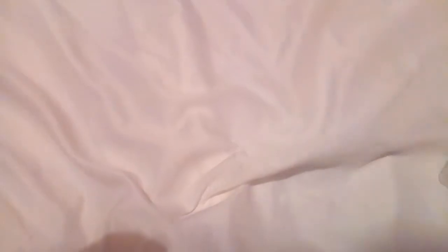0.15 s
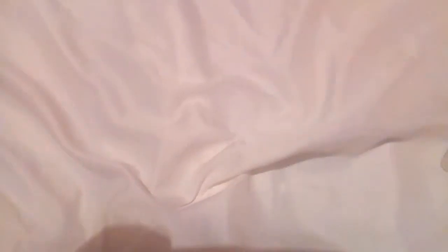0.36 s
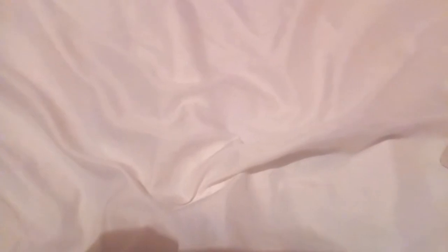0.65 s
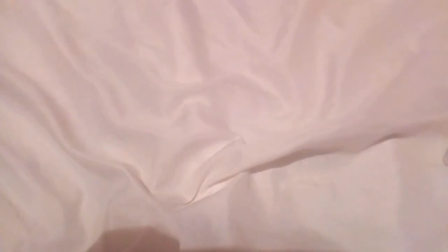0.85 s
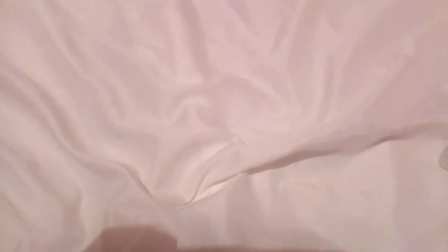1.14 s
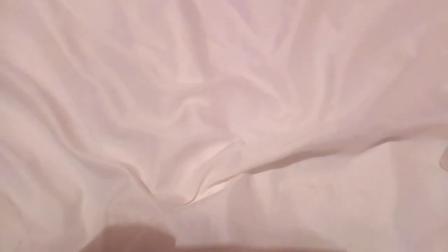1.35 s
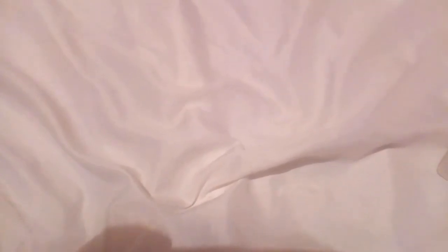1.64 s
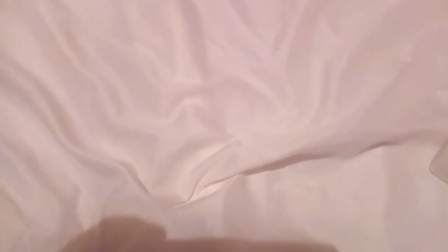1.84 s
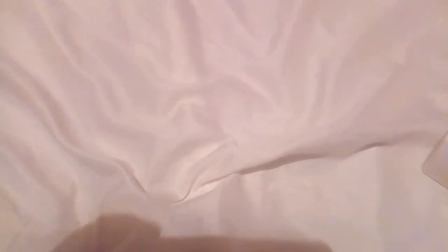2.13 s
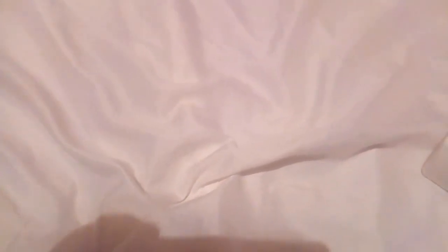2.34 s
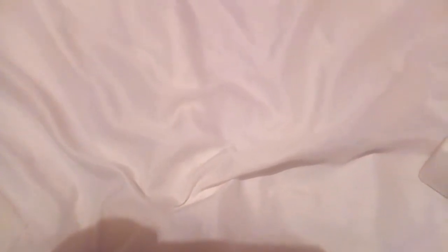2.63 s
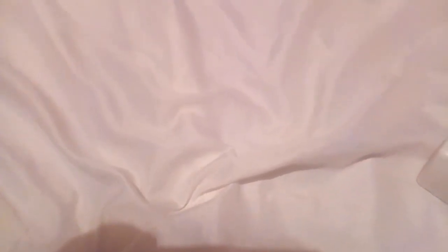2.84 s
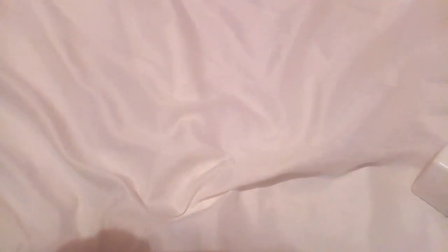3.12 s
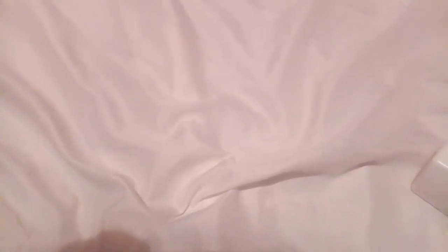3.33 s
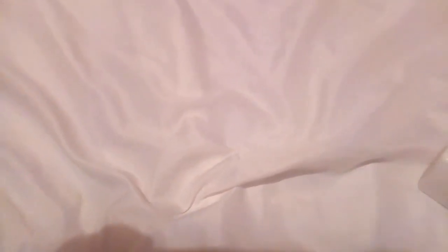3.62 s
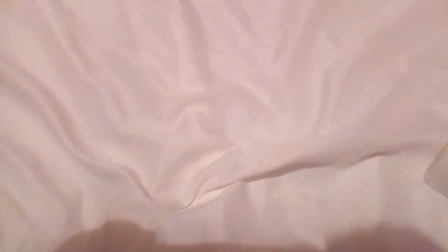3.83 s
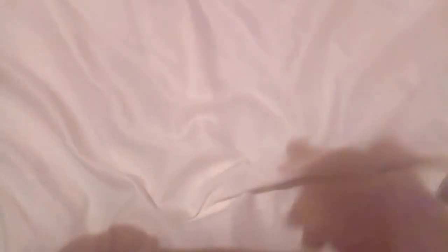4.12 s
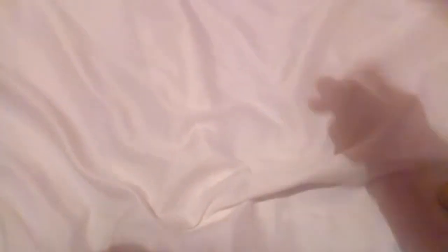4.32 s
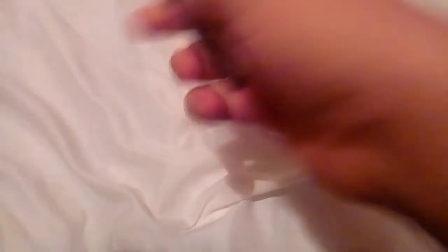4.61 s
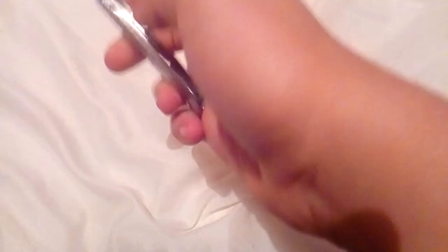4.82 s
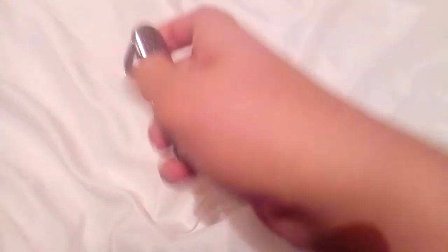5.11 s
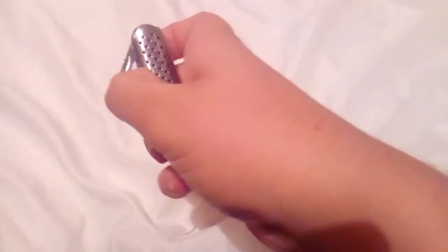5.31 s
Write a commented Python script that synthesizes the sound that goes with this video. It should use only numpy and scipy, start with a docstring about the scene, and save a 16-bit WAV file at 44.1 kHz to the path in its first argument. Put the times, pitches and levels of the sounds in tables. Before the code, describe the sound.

Close to a small camera microphone in a quiet room, a cheap steel pocket tool is fiddled with: a cluster of thin ticks early, long near-silence, a few more clicks and two dull knocks on the camera case, then a loud bright spring snap with a short chatter, followed by small clicks and soft finger hiss. Low rumble and even hiss lie underneath.

```python
"""A cheap steel pocket tool is handled over a bed, close to a small camera's microphone in a quiet room.
Its leaves tick (a blow with a dying scrape), and brief swells of noise ring through the steel frame's modes.
One leaf snaps home on its spring in a bright ring, then chatters; fingers slide on the handle in a grainy hiss.
Two duller knocks and faint low rubs come from the camera's case, over shaped noise for rumble and hiss.
Near reflections and a wall tail follow the ticks, swells, snap and knocks; the microphone favours 6 kHz."""
import sys
import numpy as np
from scipy import signal
from scipy.fft import rfft, irfft, next_fast_len
from scipy.io import wavfile
from scipy.ndimage import map_coordinates

SR = 44100
rng = np.random.default_rng(int(sys.argv[2]) if len(sys.argv) > 2 else 0)


def wav_record(signal):
    """Record a signal, one row per channel, as 16-bit PCM in the file named by sys.argv[1]."""
    frames = np.transpose(np.atleast_2d(signal))
    bounded = np.clip(frames, -1, 1)
    # unit amplitude maps onto the largest positive 16-bit level
    quanta = np.round(bounded * 32767).astype(np.int16)
    wavfile.write(sys.argv[1], SR, quanta)


N = 241116  # samples

SNAP_S = 4.2116  # the leaf hits its stop


def amp(db):
    """Decibels to gain."""
    return 10 ** (np.asarray(db) / 20)


def unit(x):
    """Scaled to rms 1."""
    return x / np.sqrt(np.mean(x ** 2) + 1e-20)


def burst(x):
    """Scaled to the energy of one millisecond at rms 1."""
    return x / np.linalg.norm(x) * np.sqrt(SR / 1000)


def along(points, hz):
    """(Hz, value) points read on a log frequency axis."""
    f, values = np.transpose(points)
    return np.interp(np.log(hz + 1), np.log(f + 1), values)


def filtered(x, response):
    """x times a complex response of frequency, padded so that the ringing does not wrap round."""
    m = next_fast_len(len(x) + SR // 10)
    spectrum = rfft(x, m) * response(np.fft.rfftfreq(m, 1 / SR))
    return irfft(spectrum, m)[:len(x)]


def resonance(f, hz, width):
    """One causal damped mode with peak gain 1."""
    return 1j * f * width / (hz * hz - f * f + 1j * f * width)


def ringing(f, modes, vary_db, order=1):
    """A body's modes, strengths varied by vary_db; order 2 makes each ring swell before it dies."""
    total = 0
    for k, (hz, width, db) in enumerate(modes):
        strength = amp(db + vary_db * rng.standard_normal())
        total = total + (-1) ** k * strength * resonance(f, hz, width) ** order
    return total


def swell(s, rise, fall):
    """The gain of one stroke: it grows up to time s, then dies away exponentially."""
    t = np.arange(N) / SR - s
    return np.exp(-np.maximum(-t / rise, t / fall))


def add(track, s, sound):
    """Mix a sound in at time s."""
    part = track[round(s * SR):][:len(sound)]
    part += sound[:len(part)]


def in_room(x, near_db, near_decay, tail_db, delay=.0035):
    """The sound, quick reflections off hand and camera, and a fresh noise tail from the walls."""
    # the room's decay: f/Hz, t60/s
    decay_times = [(200, 0.69), (2000, 0.21), (6000, 0.24), (14000, 0.079)]
    hz, frames, z = signal.stft(rng.standard_normal(SR // 2), SR, nperseg=256)
    fade = amp(-60 * frames / along(decay_times, hz)[:, None])
    tail = signal.istft(z * fade, SR, nperseg=256)[1]
    t = np.arange(len(tail)) / SR
    late = t > delay
    tail = tail * late
    near = rng.standard_normal(len(t)) * np.exp(-t / near_decay) * late
    echoes = amp(near_db) * near / np.linalg.norm(near) + amp(tail_db) * tail / np.linalg.norm(tail)
    return signal.fftconvolve(x, (t == 0) + echoes)


def contact(decay, grit):
    """The force of a touch: one blow, then a dying scrape of tiny slips (decay in s)."""
    t = np.arange(SR // 10) / SR
    slips = grit * burst(rng.standard_normal(len(t)) * np.exp(-t / decay))
    return slips + burst(t == 0)


def floor(level_db=-58):
    """The still room's rumble under an even hiss: noise shaped in frequency."""
    # room rumble and microphone hiss: f/Hz, density/dB per Hz
    noise_shape = [(15, -11), (30, -14.5), (50, -4), (100, 1), (160, -3), (280, -6.5), (500, -11),
                   (1000, -15), (2000, -19), (4000, -20.5), (8000, -22.5), (16000, -20)]
    noise = filtered(rng.standard_normal(N), lambda f: amp(along(noise_shape, f)))
    return amp(level_db) * unit(noise)


def grip():
    """Skin of the other hand drags on the camera's case: a faint low rub of resonant noise."""
    # shifts of the grip: peak t/s, level/dB, rise and fall/s
    rubs = [(.15, -64.5, 0.33), (1.19, -61, .03), (3.37, -70, 0.12)]
    rub = filtered(rng.standard_normal(N), lambda f: resonance(f, 220, 244) ** 2)
    strokes = sum(amp(db) * swell(s, length, length) for s, db, length in rubs)
    return strokes * unit(rub)


def slide(grain_db=3.5, grain_rate=300):
    """Finger skin catches and slips on the steel: a soft hiss, its level jittered at grain_rate (Hz)."""
    # strokes along the handle: peak t/s, level/dB, rise/s, fall/s
    slides = [ (.17, -57.5, 0.057, .065), (.39, -66.5, 0.071, .06), (.7, -65, .02, 0.073),
              (1.16, -63.5, .04, .02), (3.48, -62.5, .06, 0.077), (4.22, -62, 0.24, 0.09),
              (4.561, -55.5, 0.034, 0.054), (4.92, -65.5, 0.19, 0.063), (5.025, -59, 0.02, 0.032), ]
    # the hiss of skin on steel: f/Hz, density/dB per Hz
    skin = [(500, -40), (2500, -21), (4200, 0), (5500, 4), (6700, 1), (9000, -13), (16000, -12)]
    t = np.arange(N) / SR
    grain = map_coordinates(rng.standard_normal(int(N * grain_rate / SR) + 4), [t * grain_rate])
    hiss = filtered(rng.standard_normal(N), lambda f: amp(along(skin, f)))
    strokes = sum(amp(db) * swell(s, rise, fall) for s, db, rise, fall in slides)
    return strokes * unit(hiss * amp(grain_db * grain))


def knocks(ring_width=230, ring_db=3.0, thump_db=0):
    """A soft push on the plastic case: a low thump, a hollow body, a dry tick and one short ring."""
    # knocks on the camera: t/s, level/dB, ring f/Hz, softness corner f/Hz
    knock_table = [(3.4018, -40, 1670, 2600), (3.72, -38.5, 1250, 2000)]
    out = np.zeros(N)
    for s, db, hz, corner_hz in knock_table:
        def response(f):
            thump = amp(thump_db) * resonance(f, 300, 230)
            hollow = 0.63 * resonance(f, 770, 460)
            tick = 0.38 * resonance(f, 3200, 1700)
            ring = amp(ring_db) * resonance(f, hz, ring_width)
            return (thump + hollow + tick + ring) / (1 + 1j * f / corner_hz)

        knock = amp(db) * burst(filtered(contact(0.0033, grit=0.57), response))
        add(out, s, in_room(knock, near_db=-11.0, near_decay=0.003, tail_db=-12.5))
    return out


def touch(s, force, db, hz, clack_db, edge_db, spread_hz=2500):
    """A force at time s rings the frame around its own centre, between a low clack and a sharp edge."""
    # modes of the tool's frame: f/Hz, width/Hz, level/dB
    frame = [(1860, 350, -22), (3160, 270, -1), (4010, 270, 2.5), (4500, 480, -3), (5250, 320, -3),
             (5850, 320, -1.5), (6250, 700, -3), (6840, 880, -4.5), (7830, 330, -2.5)]
    ring = filtered(force, lambda f: ringing(f, frame, vary_db=2) * resonance(f, hz, spread_hz) ** 2)
    clack = filtered(force, lambda f: resonance(f, 2160, 2400))
    edge = filtered(force, lambda f: resonance(f, 10000, 10000) ** 2)
    # after 4.33 s the tool is held in front of the lens, and its echoes are 7 dB weaker
    echo_db = -7 * (s > 4.33)
    body = burst(ring) + amp(clack_db) * burst(clack)
    sound = in_room(body, near_db=echo_db - 10.5, near_decay=0.0047, tail_db=echo_db - 11.0)
    add(sound, 0, amp(edge_db) * burst(edge))  # without echoes: the bedding swallows them
    return amp(db) * sound


def noise_swells(clack_db=-14, edge_db=-14):
    """Brief swells of noise through the frame; the one at 4.207 s is a faint high hiss before the snap."""
    # swells of noise: peak t/s, level/dB, rise/s, fall/s, ring centre f/Hz
    swell_table = [ (.667, -41, 0.0047, 0.0079, 5660), (3.39, -56, 0.018, 0.011, 5800),
                   (4.155, -59, .008, 0.0043, 4800), (4.207, -49, 0.0037, 0.0037, 7400),
                   (4.257, -49.5, .012, 0.015, 5900), (4.354, -49.5, 0.0018, 0.014, 5200),
                   (4.513, -56.5, 0.0064, .006, 3300), (4.629, -52, 0.0031, 0.0037, 4500),
                   (5.197, -56, 0.0045, 0.0092, 5470), ]
    out = np.zeros(N)
    lead = .1  # s of sound ahead of the peak
    for s, db, rise, fall, hz in swell_table:
        envelope = swell(s, rise, fall)[round((s - lead) * SR):][:SR // 4]
        noise = envelope * rng.standard_normal(len(envelope))
        size = envelope.max() / burst(envelope).max()  # a longer swell carries more energy
        add(out, s - lead, size * touch(s, noise, db, hz, clack_db, edge_db))
    return out


def clicks():
    """Steel parts meet with one short contact each and ring the frame."""
    # parts clicking: t/s, level/dB, scrape decay/s, ring centre f/Hz, low clack/dB, treble edge/dB
    click_table = [ (.2637, -52, .003, 6800, -14, 5), (.5385, -35, .0014, 5900, -14, -4.5),
                   (.541, -38.5, 0.00091, 4160, -17, -12), (.5757, -33.5, .003, 6160, -14, -8),
                   (.6331, -43.5, 0.0009, 4500, -10, -18), (.6625, -41, 0.0034, 3270, -3, -16),
                   (.6822, -46.5, 0.00091, 5500, 2, -10), (1.146, -48.5, 0.0023, 5200, -21, -15),
                   (2.458, -48, .0016, 6400, -9, -12), (2.8742, -36, 0.0011, 6200, -15, -14),
                   (3.3522, -29.5, 0.0023, 6240, -12, -9), (3.4016, -38, 0.00051, 5800, -4.5, 0),
                   (3.503, -47, .0005, 5300, -18, -16), (3.6876, -43.5, 0.00036, 7000, -20, -6),
                   (4.3667, -35.5, 0.00071, 2350, -38, -24), (4.3674, -30.5, 0.00051, 5470, -34, -23),
                   (4.393, -48, .0005, 4500, -21, -20), (4.3988, -32, 0.00066, 6150, -17, -14),
                   (4.516, -46, .0008, 5560, -6, -14), (4.5898, -48, 0.00035, 6500, -16, -13),
                   (5.2064, -42.5, .001, 5200, -13, -14), (5.2911, -38.5, 0.0018, 5500, -9, -31), ]
    out = np.zeros(N)
    for s, db, decay, hz, clack_db, edge_db in click_table:
        add(out, s, touch(s, contact(decay, grit=1.16), db, hz, clack_db, edge_db))
    return out


def chatter(level_db=-25.0, decay=0.0049, hz=5700, clack_db=-16, edge_db=-16):
    """Just after the snap the leaf buzzes briefly on the frame: a gritty contact (decay in s)."""
    out = np.zeros(N)
    buzz = touch(SNAP_S, contact(decay, grit=1.6), level_db, hz, clack_db, edge_db)
    add(out, SNAP_S + .003, buzz)
    return out


def snap(level_db=-11.5):
    """The spring throws a leaf against its stop; each mode of its ring swells before it dies."""
    # modes of the sprung leaf, each applied twice: f/Hz, width of one pass/Hz, level/dB
    leaf = [(2420, 1500, -25.5), (4150, 390, -11.5), (5200, 220, -6.5), (5900, 450, 2), (6990, 410, 5),
            (7830, 320, -9), (11600, 2900, -16.5), (14500, 1000, -25)]
    ring = filtered(contact(0.00086, grit=0.11), lambda f: ringing(f, leaf, vary_db=0.0, order=2))
    out = np.zeros(N)
    sound = amp(level_db) * burst(ring)
    add(out, SNAP_S, in_room(sound, near_db=-25, near_decay=0.0036, tail_db=-21.5))
    return out


def scene():
    """Everything reaches one microphone."""
    tool = clicks() + noise_swells() + snap() + chatter()
    hands_and_case = knocks() + slide() + grip()
    return (tool + hands_and_case + floor())[None]


def record(dry):
    """The microphone port colours the sound; nothing is kept above the band limit."""
    # response of the microphone port: f/Hz, gain/dB
    port = [(3000, 0), (5000, 0), (6400, 0.5), (7100, -5), (8000, -11.5), (9500, -13), (13800, -15),
            (14700, -2.5), (15500, -5.5)]
    top_hz = 15650
    return np.array([filtered(x, lambda f: amp(along(port, f)) * (f < top_hz)) for x in dry])


dry = scene()
out = record(dry)
wav_record(out)
```